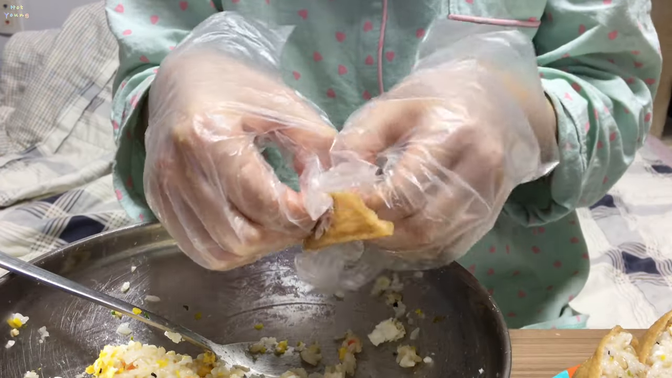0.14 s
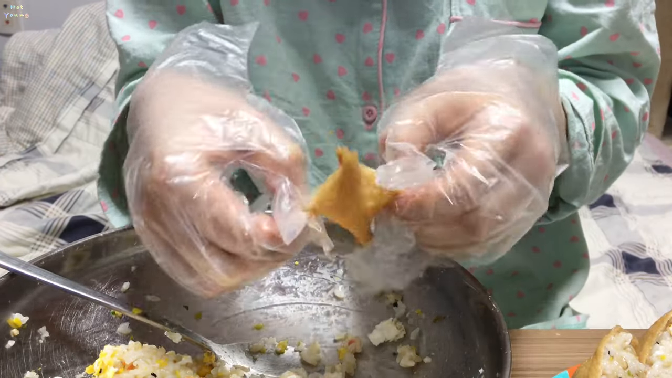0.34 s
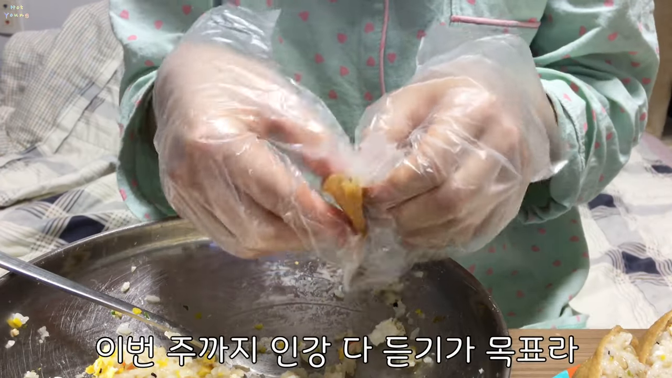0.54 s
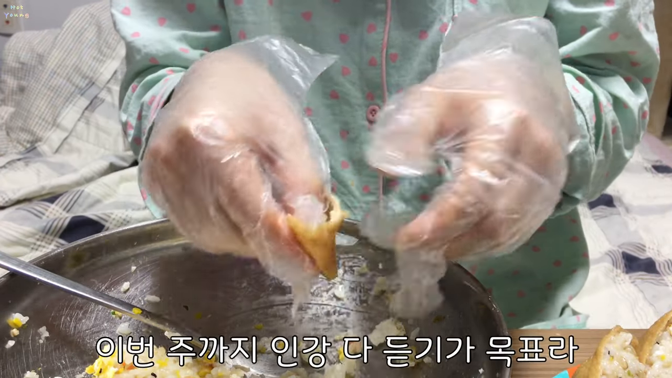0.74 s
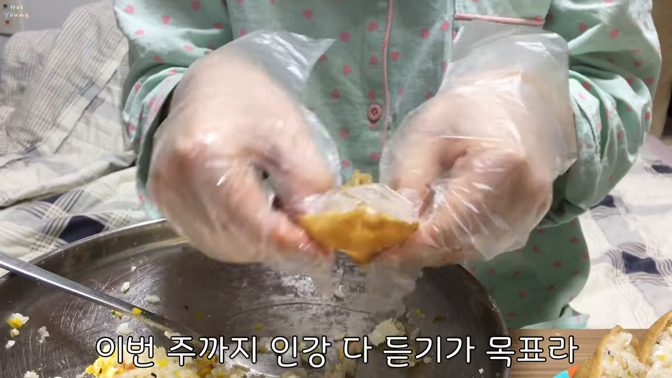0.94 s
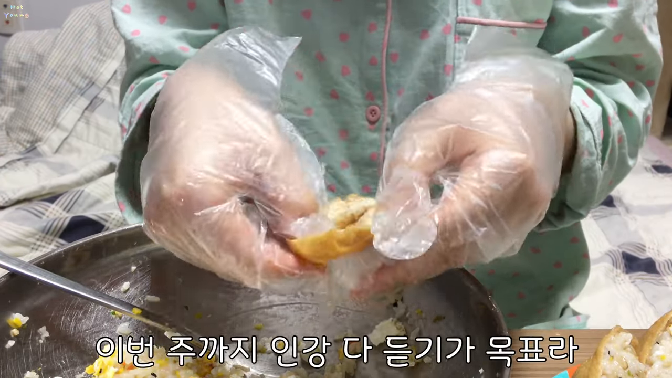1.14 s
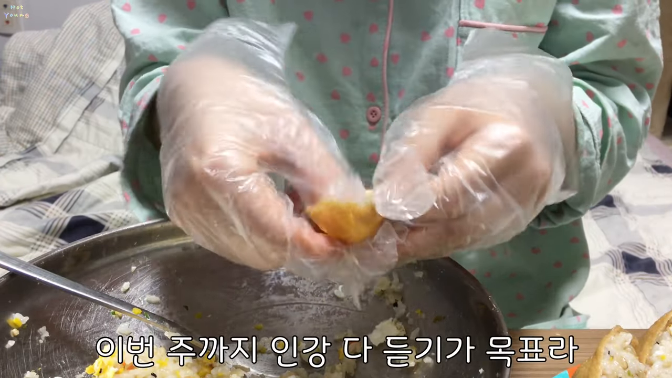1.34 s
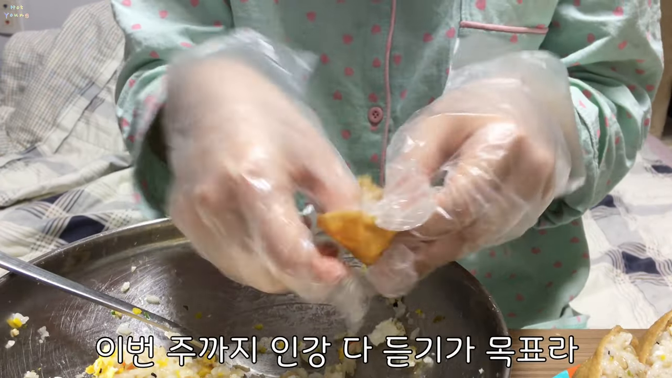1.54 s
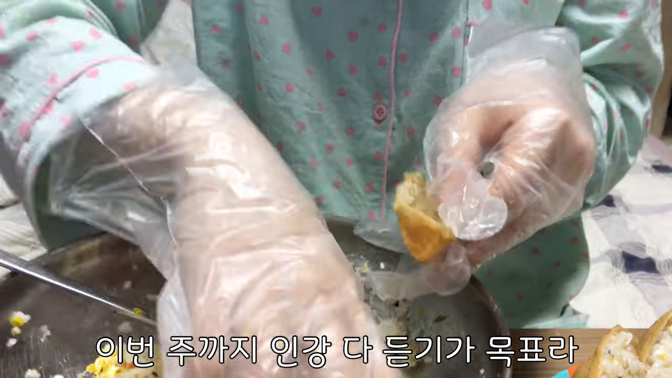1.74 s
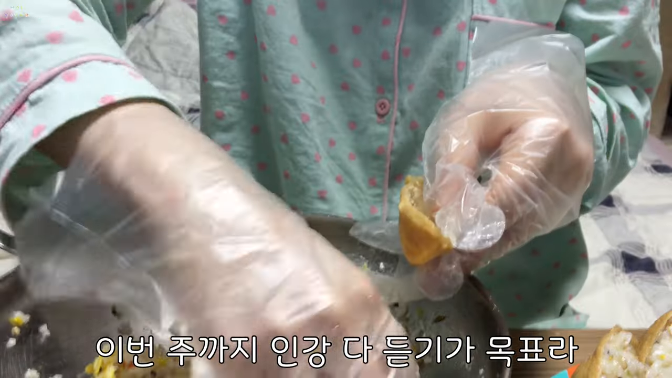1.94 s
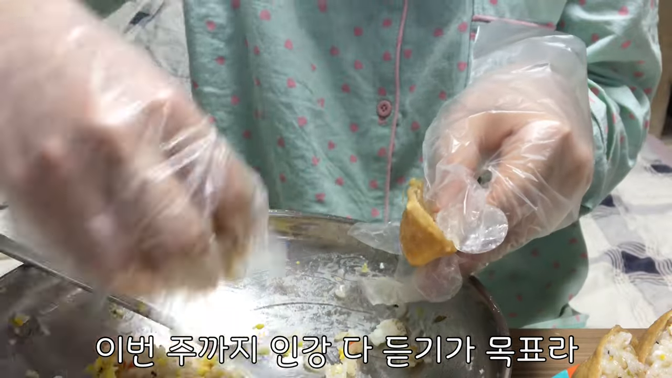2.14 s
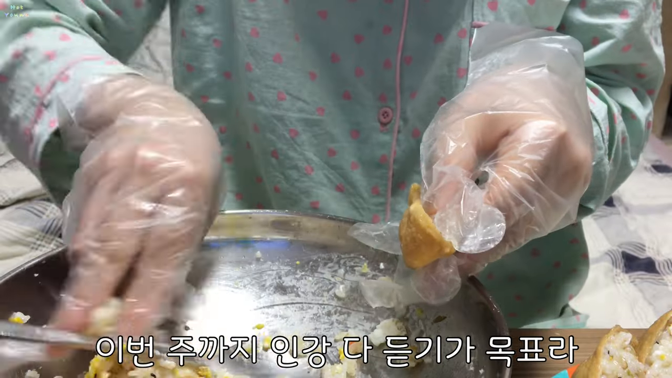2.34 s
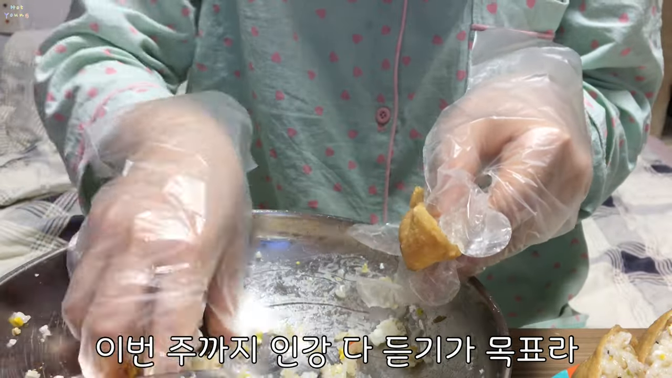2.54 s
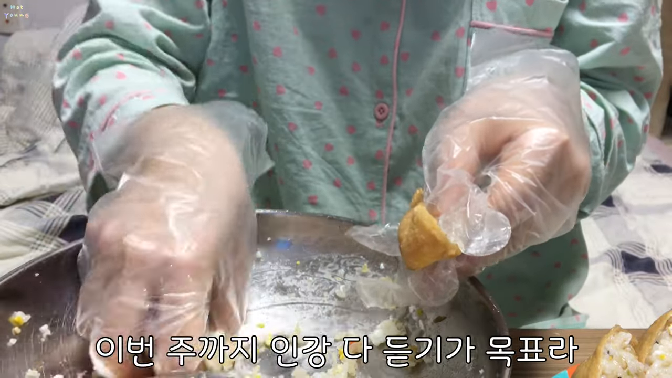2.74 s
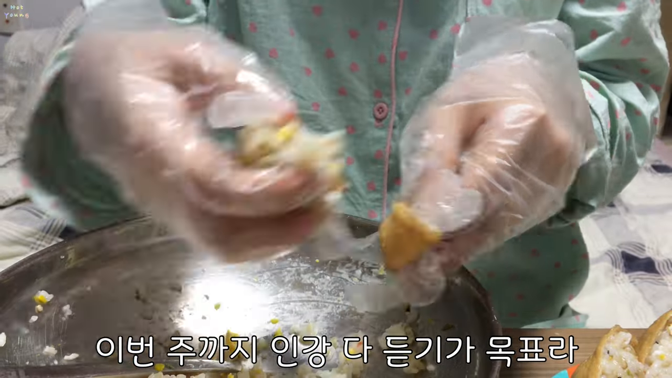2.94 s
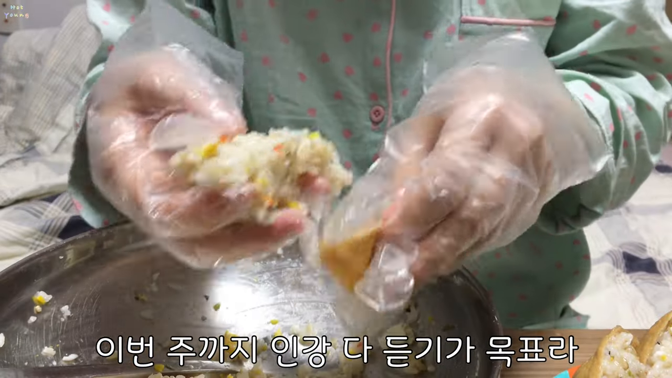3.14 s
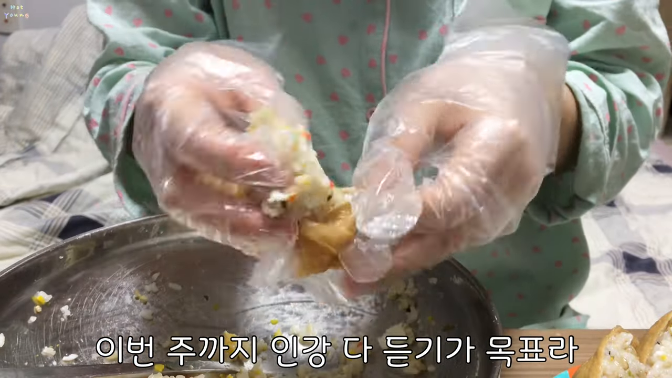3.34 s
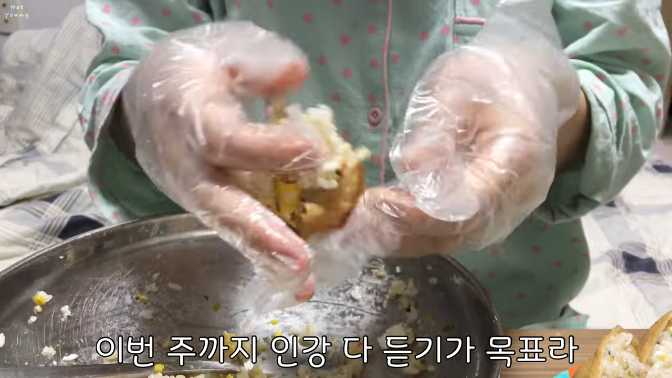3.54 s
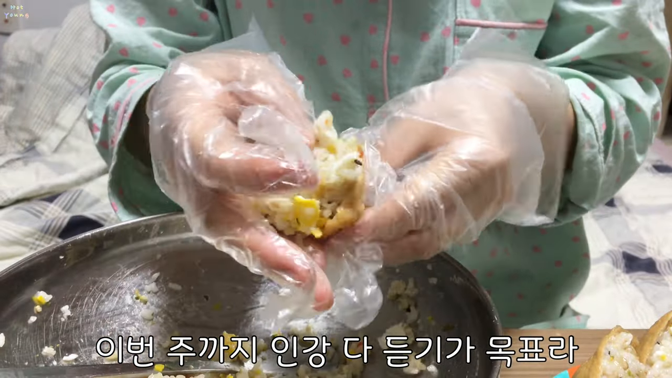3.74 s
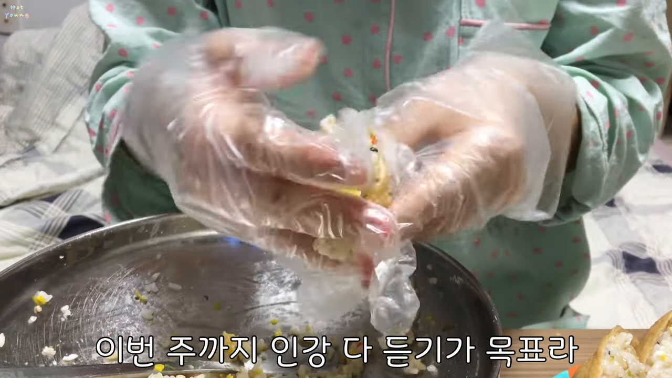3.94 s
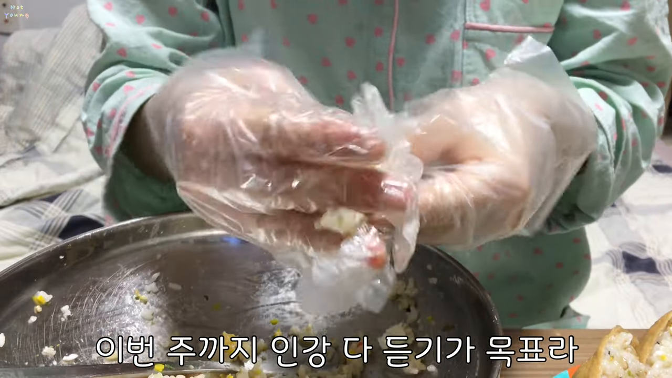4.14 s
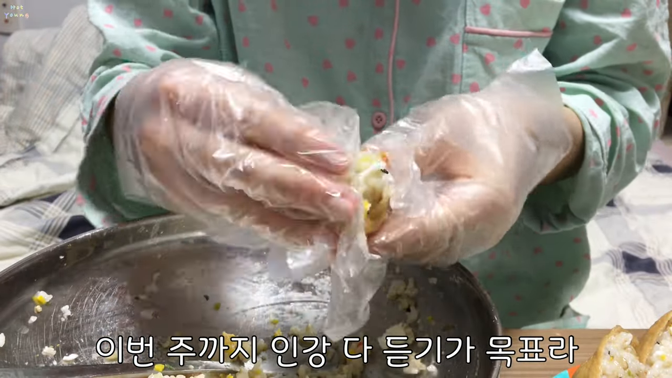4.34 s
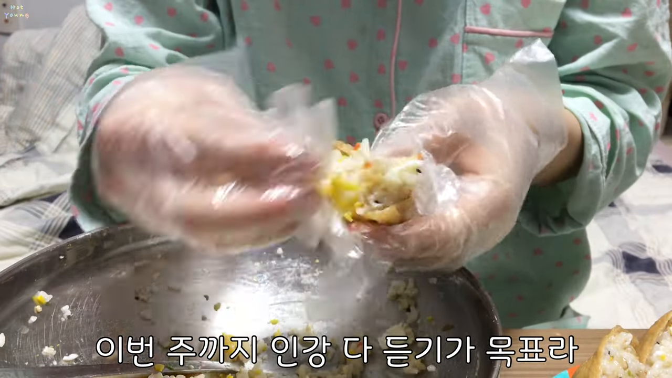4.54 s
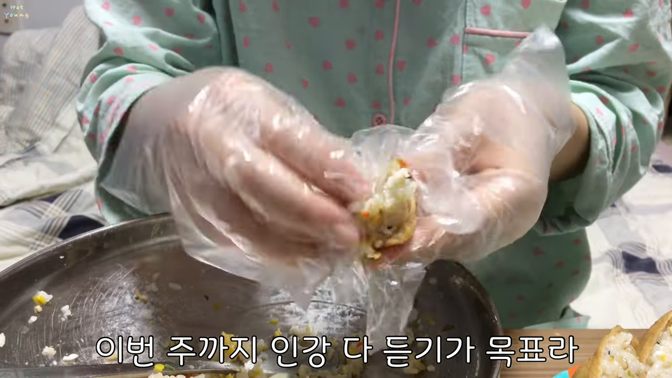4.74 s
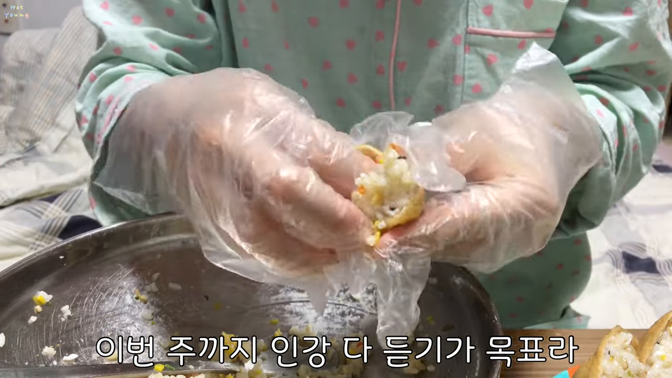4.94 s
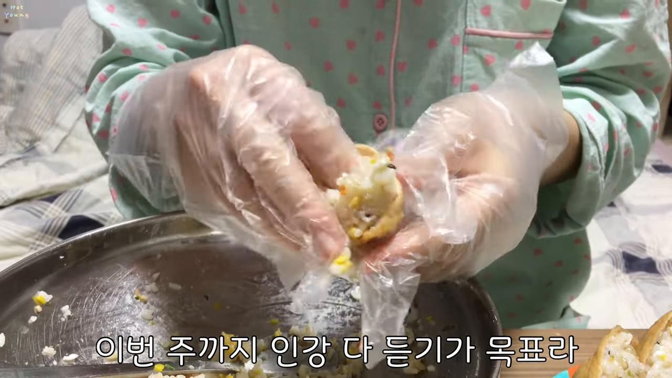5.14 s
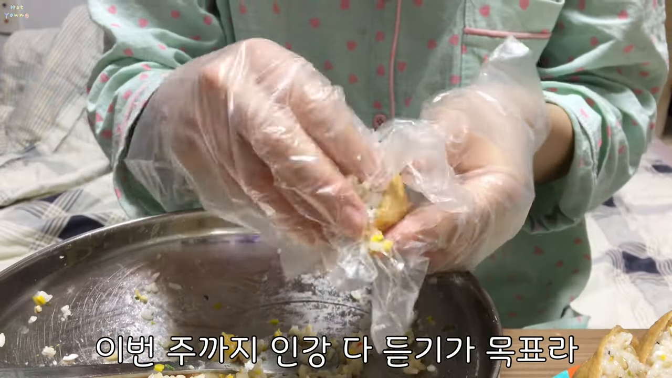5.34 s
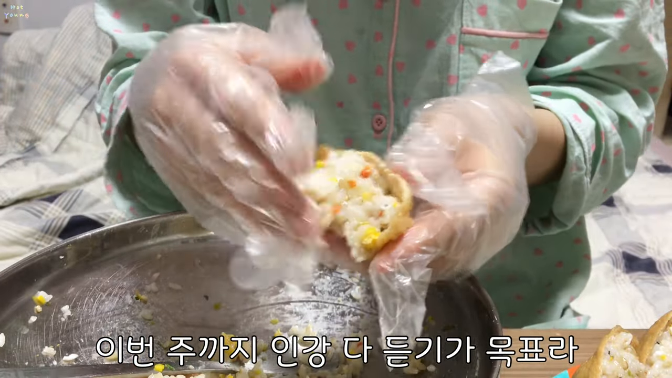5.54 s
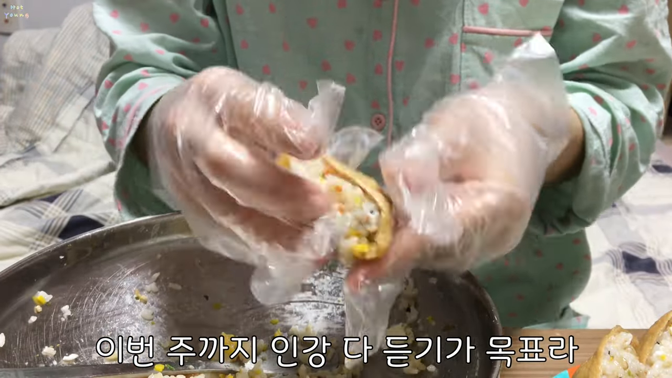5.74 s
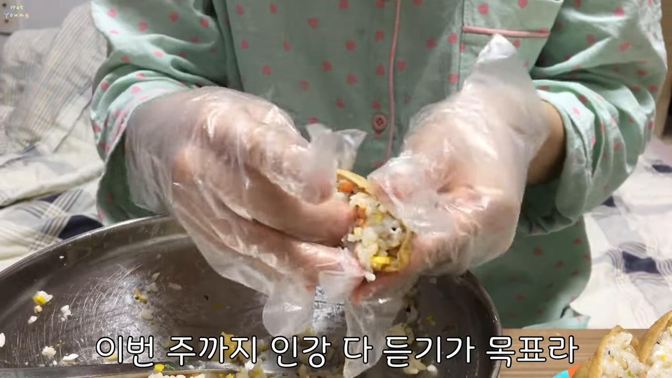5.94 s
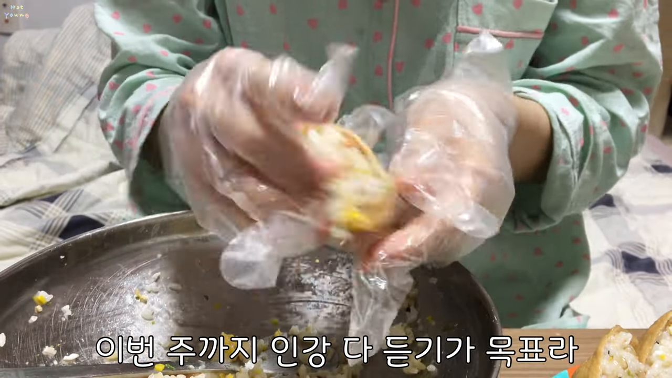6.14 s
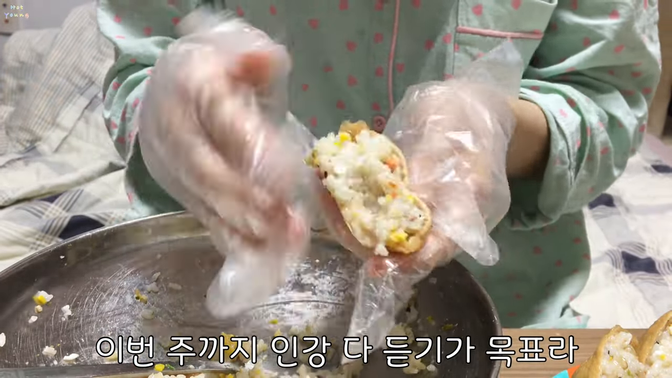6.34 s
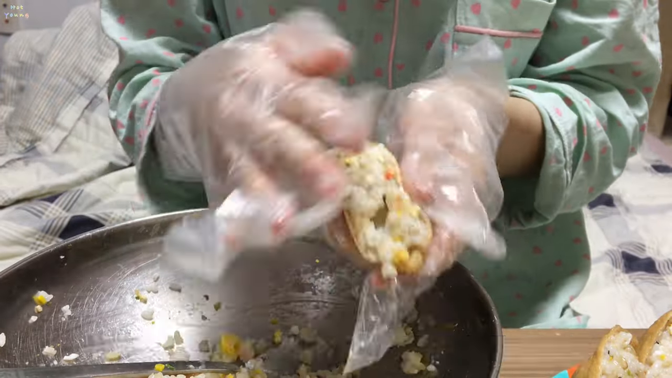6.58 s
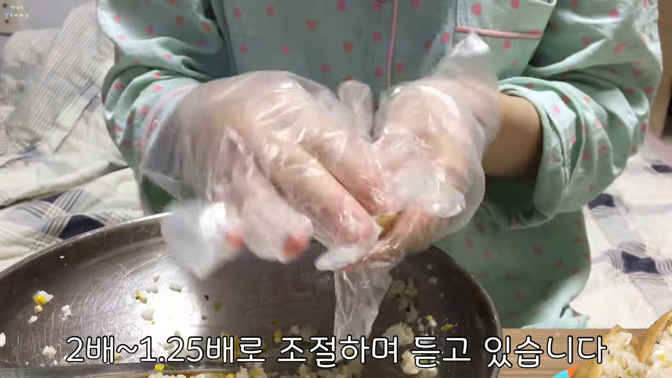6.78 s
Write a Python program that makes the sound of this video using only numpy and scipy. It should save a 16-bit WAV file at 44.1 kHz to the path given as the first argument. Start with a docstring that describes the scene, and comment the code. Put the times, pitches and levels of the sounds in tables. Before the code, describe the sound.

Hands in disposable gloves crackle steadily as they stuff rice, once knocking a metal tray and scraping along it.

```python
"""In a kitchen, close to a mono microphone, hands in thin plastic gloves stuff rice into a tofu pouch
over a steel tray. Each squeeze crinkles the plastic film in a swarm of tiny buckles, with a few louder
snaps, while film rubs on film. One hand reaches down, knocks the tray so it rings, rests a moment,
scrapes up rice along the steel and goes back to pressing. An appliance hums faintly behind it all."""
import sys
import numpy as np
from scipy import signal
from scipy.fft import rfft, irfft, next_fast_len
from scipy.io import wavfile
from scipy.ndimage import uniform_filter1d

SR = 44100
rng = np.random.default_rng(int(sys.argv[2]) if len(sys.argv) > 2 else 0)


def wrap_up_sound(samples):
    """Save the sound to the file named by the first command line argument, as 16-bit audio."""
    columns = np.atleast_2d(samples).T
    # keep every value between -1 and 1, then stretch to whole-number steps
    tamed = np.clip(columns, -1, 1)
    steps = np.round(tamed * 32767).astype(np.int16)
    wavfile.write(sys.argv[1], SR, steps)


N = 300321
TIME = np.arange(N) / SR

# finger squeezes: start t/s, length/s, crinkle level/dB, rubbing and slack folds (each relative
# to the crinkle)/dB, swell time/s
FINGER_SQUEEZES = [(0, 0.077, -56.5, -5.5, 10, 0.009), (0.076, 0.063, -47, -15.5, 2, 0.024),
                   (0.227, 0.01, -47.5, -9, 4.5, 0.011), (0.323, 0.081, -45.5, -10.5, 6, 0.051),
                   (0.45, 0.12, -47.5, -14, 4, 0.015), (0.57, 0.18, -49, -10.5, 6, 0.063),
                   (0.757, 0.27, -48, -10.5, 5, 0.096), (1.044, 0.078, -47, -11, 5, 0.028),
                   (1.134, 0.35, -51.5, -12, 7.5, 0.05), (1.532, 0.073, -45.5, -14, 3.5, 0.028),
                   (1.623, 0.18, -43.0, -10.5, 2, 0.06), (2.033, 0.04, -54.5, -2.5, 5, 0.032),
                   (2.258, 0.19, -45.5, -11.5, 3, 0.03), (2.505, 0.11, -46.5, -13, -6, 0.045),
                   (2.92, 0.18, -51.5, -9.5, -5, 0.023), (3.226, 0.33, -54, -24, 1, 0.037),
                   (3.47, 0.27, -46, -13, -5, 0.062), (3.872, 0.09, -46, -9.5, -1.5, 0.053),
                   (4.015, 0.12, -50, -7, 1, 0.012), (4.15, 0.071, -46, -9.5, -1, 0.033),
                   (4.322, 0.11, -46.5, -10, 7.5, 0.044), (4.44, 0.067, -45, -15, -4, 0.056),
                   (4.601, 0.052, -45.5, -7, 6, 0.041), (4.694, 0.112, -46, -11.5, -2, 0.033),
                   (5.031, 0.081, -43, -11, 2, 0.037), (5.167, 0.023, -41.5, -13, 4.5, 0.021),
                   (5.202, 0.069, -47.5, -18, 1, 0.026), (5.429, 0.12, -45.5, -16.5, 0, 0.057),
                   (5.565, 0.18, -46.5, -11.5, -1, 0.03), (5.674, 0.061, -43, -8.5, 1, 0.036),
                   (5.765, 0.05, -48.5, -4.5, 9, 0.026), (5.905, 0.11, -50.5, -11, 5.5, 0.069),
                   (6.043, 0.031, -43.5, -10, 2, 0.05), (6.128, 0.13, -47, -11, -1.5, 0.017),
                   (6.288, 0.2, -41, -13, -1, 0.075), (6.541, 0.11, -48.5, -9, 0, 0.024),
                   (6.722, 0.061, -45, -15, 2, 0.029)]
# steady handling between squeezes, with a rest after the knock: t/s, crinkle level/dB
STEADY_HANDLING = [(0, -49.5), (0.2, -51.5), (0.33, -58.5), (0.41, -51), (1.11, -52.5), (1.51, -56),
                   (1.85, -44.5), (2, -47.0), (2.14, -62.5), (2.27, -47), (2.7, -48.5), (2.88, -50),
                   (3.18, -51.5), (3.47, -47.5), (4.3, -45), (4.58, -48.5), (4.9, -47.0), (5.41, -46.5),
                   (5.89, -48.0), (6.81, -48.5)]
# tone colour of buckling film: f/Hz, relative level/dB
FILM_COLOUR = [(200, -14), (1200, -11), (2300, -11), (3100, -2), (4000, -5.5), (5000, -1.5), (5900, -1.1),
               (7000, -2), (9000, 0.5), (11200, 1.5), (12400, -1), (13600, 2), (15700, 4.5)]
# tone colour of film rubbing on film: f/Hz, relative level/dB
RUB_COLOUR = [(40, -27), (90, -29), (150, -2), (300, -4.5), (450, -2.5), (700, 1), (1000, 2.5), (1300, 1),
              (2200, 2), (4000, 0), (12000, -9.5)]
# the loudest creases snapping through: t/s, level/dB, f/Hz, relative level of the flurry after it/dB
CREASE_SNAPS = [(0.1052, -27, 5000, -13), (0.148, -27, 9500, -30), (0.3108, -30.5, 6360, -18),
                (0.3514, -34, 4200, -14), (0.459, -27, 8440, -9), (0.528, -28, 7810, -5),
                (0.5635, -29, 10200, -7), (0.6344, -24, 7240, -9), (0.706, -22, 11200, -20),
                (1.6077, -25, 12000, -6), (1.87, -29, 11100, -13), (3.0983, -27, 7980, -18),
                (3.147, -23, 13900, -21), (3.7792, -29, 7240, -4.5), (3.8989, -35, 11100, -22),
                (3.941, -24, 12000, -5), (4.3246, -23, 9030, -15), (4.5213, -34, 12000, -16),
                (4.632, -31, 3400, -2), (4.648, -30, 3500, -5), (5.0938, -28, 10000, -18),
                (5.1895, -28, 13100, -5), (5.3276, -24, 10500, -5), (5.9212, -29, 10100, -25),
                (6.0017, -27, 7050, -18), (6.08, -28, 9000, -20), (6.147, -27, 5280, -5)]
# blows on the tray: t/s, strength/dB, hardness (treble gain)/dB, clatter gain/dB, table thud level/dB,
# gain of the belly tone (the tray's middle)/dB
TRAY_KNOCKS = [(1.76, -13.5, -5, 5, -36, -7), (1.7685, -15, 3.5, 6.5, -43, -6),
               (1.874, -34, -15, 2, -60, -8), (1.9387, -19, -15, 8, -54, 2),
               (1.9495, -7.5, 9, 4, -44, -4.5), (2.2716, -34, 14, -10, -60, -6),
               (2.2852, -24.5, 13, -8, -73, 10), (2.3428, -19.5, -15, -6, -63, 1),
               (5.238, -34.5, -15, -3, -76, 3.5), (6.43, -29.5, -10, 0, -68, 1)]
# the steel rebounds after a blow: delay t/s, relative level/dB
REBOUNDS = [(0, 0), (.0023, -7), (.0062, -7), (0.012, -17)]
# ringing tones of the tray, damped by food and table: f/Hz, level/dB, time to fade by 60 dB/s
TRAY_TONES = [(325, -31, .07), (385, -32, .05), (465, -32, .045), (554, -23.5, .09), (635, -33, .04),
              (720, -29, .09), (827, -40, .11), (1584, -36, .05), (2870, -38, .05), (3050, -37, .04),
              (3222, -37, .07), (4950, -35, .085), (5895, -37, .09), (6203, -33, .09), (6700, -32, .04),
              (7770, -36, .085), (8358, -22, .058), (8560, -29, .04), (9510, -21, .04), (9596, -29, .08),
              (10024, -23, .058), (10690, -36, .15), (12880, -36, .07), (14255, -34, .05),
              (14768, -31, .05), (15394, -29, .055)]
# tones of the table under the tray: f/Hz, level/dB, time to fade by 60 dB/s
TABLE_TONES = [(123, -0.5, 0.092), (186, -12, 0.04)]
# tone colour of the tray's short, dense clatter: f/Hz, relative level/dB
CLATTER_COLOUR = [(100, -8), (400, 16.5), (750, 8.5), (1100, -6), (2200, -5), (3000, -7), (7000, 2),
                  (9500, 15), (11500, 0), (13500, 5), (16000, 6.5)]
# strokes dragging rice over the steel: start t/s, length/s, level/dB
SCRAPE_STROKES = [(2.279, 0.025, -38.5), (2.327, 0.28, -47.5), (2.384, 0.037, -41), (2.52, 0.1, -45.5),
                  (2.59, 0.023, -43), (2.66, 0.15, -45.5)]
# sticky slips during the scrape: t/s, level/dB, f/Hz
SCRAPE_SLIPS = [(2.311, -21, 4660), (2.407, -24, 4400), (2.6154, -22, 3230), (2.6206, -16.5, 3660),
                (2.646, -23, 4350), (2.7113, -29, 4050), (2.732, -21.5, 3920), (2.768, -24, 4480),
                (2.7976, -26, 4720), (2.831, -22, 5200)]
# tones of the steel under the scraping hand: f/Hz, width/Hz, relative level/dB
SCRAPE_TONES = [(3310, 200, -7.5), (3740, 150, -23), (4470, 150, -22)]
# forearms and sleeves shifting against the table: t/s, level/dB
ARM_NUDGES = [(2.02, -67), (2.55, -68), (2.76, -67), (4.35, -71), (4.69, -67), (5.86, -81)]
# the kitchen's echo: f/Hz, time to fade by 60 dB/s
ROOM_FADE = [(150, 0.73), (1000, 0.17), (5000, 0.29), (15000, 0.074)]
# tone colour of still kitchen air: f/Hz, relative level/dB
AIR_COLOUR = [(25, -34), (45, 21), (80, -14), (140, 12.5), (260, 1), (500, 8), (1000, 2.5), (3000, -9),
              (15000, -19)]
# appliance hum: f/Hz, level/dB
HUM_TONES = [(85, -88), (120, -98), (256, -79), (332, -81.5), (428, -90.5)]


def crinkle(level_db, slack_db, sizes=60):
    """Film buckles in patches of many sizes over a fine sliding hiss; a faster hand sets off more."""
    clicks_per_s = 2700 * amp(1.1 * (level_db + 46))
    clicks = swarm(clicks_per_s, spread_db=2, clump_db=1.1, clumps_per_s=120)
    click_size = rng.integers(0, sizes, N)
    buckles = np.zeros(N)
    for k, hz in enumerate(np.linspace(2000, 15500, sizes)):
        ring = unit_rms(flip(hz, cycles=0.23 + 2.5 * rng.random() ** 3))
        starts = np.flatnonzero((clicks != 0) & (click_size == k))
        samples = starts[:, None] + np.arange(len(ring))
        rings = np.outer(clicks[starts], ring)
        buckles += np.bincount(samples.ravel(), rings.ravel(), N)[:N]  # add one ring per click
    hiss = amp(-6) * rng.standard_normal(N)
    film = steadied(coloured(unit_rms(buckles) + hiss, FILM_COLOUR))
    slack_folds = filtered(film, [2700, 6500], "band", order=1)  # loose film crackles lower
    return amp(level_db) * crease_tint(film + (amp(slack_db) - 1) * slack_folds)


def crease_tint(film, depth_db=1.4):
    """Each passing crease favours a tone colour of its own."""
    spectrum = signal.stft(film, SR, nperseg=256)[2]
    patches = uniform_filter1d(rng.standard_normal(spectrum.shape), size=8, axis=0)  # smooth over pitch
    patches = unit_rms(uniform_filter1d(patches, size=5, axis=1))  # and over time
    return signal.istft(spectrum * amp(depth_db * patches), SR, nperseg=256)[1][:N]


def hand_levels(steady_rub_db=-13.5, steady_slack_db=2):
    """Squeezes add to the steady handling; gives crinkle, rubbing and relative slack levels in dB."""
    steady = amp(np.interp(TIME, *np.transpose(STEADY_HANDLING)))
    power = np.outer(amp([0, steady_rub_db, steady_slack_db]), steady) ** 2
    for start, length, db, rub_db, slack_db, swell_s in FINGER_SQUEEZES:
        effort = amp(db) * stroke(start, length, swell_s, fade_s=0.22)
        power += np.outer(amp([0, rub_db, slack_db]), effort) ** 2
    uneven_db = 0.9 * wander(per_s=35)  # fingers never press quite evenly
    crinkle_db, rub_db, folds_db = 10 * np.log10(power) + uneven_db
    return crinkle_db, rub_db, folds_db - crinkle_db


def snaps():
    """A crease gives way with a crack and a brief ring, and shakes loose a flurry of small ticks."""
    out, t = np.zeros(N), np.arange(2000) / SR
    for start, db, hz, flurry_db in CREASE_SNAPS:
        flurry = amp(flurry_db - 60 * t / 0.025) * rng.standard_normal(len(t))
        flurry *= rng.random(len(t)) < 1500 / SR  # about 1500 ticks a second
        flurry[0] = 1  # the snap itself
        tick = 0.58 * flip(hz, cycles=0.59) + 0.55 * flip(10500, cycles=0.36)
        add(out, start, amp(db) * np.convolve(flurry, tick))
    return filtered(out, 2800, "high")


def rubbing(level_db, boost_db=2.5):
    """Film slides on film and food, making softer, duller grains of sound."""
    grains = swarm(3500, spread_db=4, clump_db=1, clumps_per_s=63)
    return amp(level_db + boost_db) * steadied(coloured(grains, RUB_COLOUR))


def tray_knocks():
    """Each blow makes the tray ring and clatter and the table thud; soft blows lack treble."""
    out, t = np.zeros(N), np.arange(SR // 3) / SR
    thud = sum(np.sin(2 * np.pi * hz * t) * amp(db - 60 * t / fade_s) for hz, db, fade_s in TABLE_TONES)
    thud *= 1 - np.exp(-t / 0.002)
    clatter_shape = amp(-9.5 - 60 * t / 0.11)
    bounces = np.zeros(len(t))
    for delay, db in REBOUNDS:
        clatter_shape += (t >= delay) * amp(db - 60 * abs(t - delay) / 0.011)
        add(bounces, delay, amp([db]))
    # the steel flexes under each contact, and clacks if the blow is hard
    flex = amp(-16.5) * signal.lfilter(flip(595, cycles=0.6), 1, bounces)
    clack = amp(-16) * signal.lfilter(flip(2720, cycles=0.48), 1, bounces)
    for start, db, hard_db, clatter_db, thud_db, belly_db in TRAY_KNOCKS:
        ring = tray_ring(belly_db)
        noise = coloured(rng.standard_normal(len(t)), CLATTER_COLOUR)
        clatter = amp(clatter_db - 19) * clatter_shape * noise
        bass = filtered(amp(1) * ring + clatter, 1640, "low")
        treble = filtered(ring + amp(db / 2) * clatter, 1700, "high")  # weak blows clatter more dully
        contact = amp(min(clatter_db, 0)) * flex + amp(min(hard_db, clatter_db, 0)) * clack
        add(out, start, amp(db) * (bass - amp(hard_db) * treble + contact) + amp(thud_db) * thud)
    return out


def tray_ring(belly_db, belly_hz=554):
    """The tray's tones die away after a blow; taps near its middle ring mostly the belly tone."""
    ring, t = np.zeros(SR // 3), np.arange(SR // 3) / SR
    for k, (hz, db, fade_s) in enumerate(TRAY_TONES):
        level_db = db + belly_db * (hz == belly_hz) - 60 * t / fade_s
        ring += (-1) ** k * amp(level_db) * np.sin(2 * np.pi * hz * t)
    return ring


def scrape(closing_at_s=2.64, smother_db_per_s=150):
    """The glove sticks and slips, ringing the steel and a pocket of film until the fingers close."""
    power = sum((amp(db) * stroke(start, length, swell_s=0.022, fade_s=0.24)) ** 2
                for start, length, db in SCRAPE_STROKES)
    closing_s = np.clip(TIME - closing_at_s, 0, 0.2)
    slips = swarm(2200, spread_db=3.5, clump_db=1.5, clumps_per_s=140)
    pocket = film_pocket(slips, hz=3280 + 6000 * closing_s)  # closing fingers raise its pitch
    low_ring = filtered(tray_ring(belly_db=5), 750, "low")
    murmur = unit_rms(signal.oaconvolve(slips, low_ring)[:N])
    steel = sum(amp(db) * unit_rms(signal.lfilter(*signal.iirpeak(hz, hz / width, fs=SR), slips))
                for hz, width, db in SCRAPE_TONES)
    steel = amp(-smother_db_per_s * closing_s) * filtered(steel, 2450, "high")
    out = np.sqrt(power) * (amp(-3) * pocket + steel + amp(-26) * murmur)
    for start, db, hz in SCRAPE_SLIPS:
        add(out, start + 0.001037, amp(db - 5.5) * flip(hz, cycles=1))
    return out


def film_pocket(slips, hz, width_hz=6000):
    """A pocket of film under the hand rings broadly around a moving pitch."""
    spin = np.exp(2j * np.pi * np.cumsum(hz) / SR)
    decay = np.exp(-np.pi * width_hz / SR)
    # shift the pitch down to zero, smooth, and shift it back up
    ring = (spin * signal.lfilter([1], np.poly([decay, decay]), slips / spin)).real
    ring = filtered(ring, 2690, "high", order=7)
    return steadied(filtered(ring, 6400, "low"))


def arm_nudges():
    """Shifting forearms send soft, low swells through the table top."""
    out, swell = np.zeros(N), np.hanning(round(0.14 * SR))
    for middle, db in ARM_NUDGES:
        add(out, middle - len(swell) / SR / 2, amp(db) * swell)
    return out * unit_rms(filtered(rng.standard_normal(N), [65, 160], "band"))


def kitchen_echo(x, echo_db, patterns=3):
    """Adds a short echo that dies faster in the treble; its pattern shifts as the hands move."""
    t, out = np.arange(SR // 2) / SR, x.copy()
    for k in range(patterns):
        hz, age, spectrum = signal.stft(rng.standard_normal(len(t)), SR, nperseg=256)
        fade = amp(-60 * age / look_up(ROOM_FADE, hz)[:, None])
        tail = signal.istft(spectrum * fade, SR, nperseg=256)[1][:len(t)]
        tail *= (t > 0.002) * (1 + 1.8 * np.exp(-t / 0.0035))  # close surfaces answer first
        share = np.cos(np.pi * (2 * TIME + k / patterns)) * np.sqrt(2 / patterns)
        out += amp(echo_db) * signal.oaconvolve(x * share, tail / np.linalg.norm(tail))[:N]
    return out


def air_and_hum(air_db=-71):
    """Faint room noise with a wavering appliance hum."""
    hum = np.zeros(N)
    for hz, db in HUM_TONES:
        height = np.sqrt(2) * amp(db + 2 * wander(6))
        hum += height * np.sin(2 * np.pi * hz * TIME + 0.55 * wander(10))
    return amp(air_db) * coloured(rng.standard_normal(N), AIR_COLOUR) + hum


def flip(hz, cycles):
    """A patch of film or steel flips and swings briefly, strongest after `cycles` swings."""
    turns = hz * np.arange(256) / SR
    age = turns / cycles
    return age * np.exp(1 - age) * np.sin(2 * np.pi * turns)


def swarm(per_s, spread_db, clump_db, clumps_per_s):
    """Random clicks, mostly small, growing louder and softer in little clumps."""
    size_db = spread_db * np.minimum(rng.exponential(1, N), 4.5) + clump_db * wander(clumps_per_s)
    return (rng.random(N) < per_s / SR) * rng.choice([-1, 1], N) * amp(size_db)


def stroke(start, length, swell_s, fade_s):
    """Loudness of one hand movement: it swells, holds, then drops 60 dB in fade_s."""
    age = TIME - start
    return np.clip(age / swell_s, 0, 1) * amp(-60 * np.clip(age - length, 0, 2 * fade_s) / fade_s)


def wander(per_s):
    """Random drift of average size 1, heading for a new value per_s times a second."""
    return unit_rms(np.interp(TIME * per_s, np.arange(8000), rng.standard_normal(8000)))


def steadied(x):
    """Takes the slow swell out of a swarm, so that the hand alone sets its loudness."""
    power = uniform_filter1d(x ** 2, 2600)
    return x / np.sqrt(abs(power) + power.mean() / 1000)


def coloured(x, colour):
    """Gives x the tone colour in a table, at average size 1."""
    size = next_fast_len(len(x) + 1024)
    gain = amp(look_up(colour, np.fft.rfftfreq(size, 1 / SR)))
    return unit_rms(irfft(rfft(x, size) * gain, size)[:len(x)])


def look_up(table, hz):
    """Reads between a table's rows, with every octave equally wide."""
    row_hz, value = np.transpose(table)
    return np.interp(np.log(hz + 1), np.log(row_hz + 1), value)


def filtered(x, hz, kind, order=2):
    """Keeps the lows, the highs or a band of x."""
    return signal.sosfilt(signal.butter(order, hz, kind, fs=SR, output="sos"), x)


def amp(db):
    """Turns decibels into a gain."""
    return 10 ** (np.asarray(db) / 20)


def unit_rms(x):
    """Scales x to an average size (rms) of 1."""
    return x / np.sqrt(np.mean(x ** 2) + 1e-20)


def add(mix, start_s, sound):
    """Adds a sound to the mix at start_s."""
    part = mix[max(round(start_s * SR), 0):][:len(sound)]
    part += sound[:len(part)]


def scene():
    """Gloves and tray in the kitchen, the same in both channels."""
    crinkle_db, rub_db, slack_db = hand_levels()
    gloves = crinkle(crinkle_db, slack_db) + rubbing(rub_db) + snaps() + scrape()
    mono = kitchen_echo(gloves, echo_db=-14) + kitchen_echo(tray_knocks(), echo_db=-25)
    mono += arm_nudges() + air_and_hum()
    return np.array([mono, mono])


def record(dry, lowest_hz=80, highest_hz=15800):
    """The microphone loses the deep bass, and the recorder cuts off the highest treble."""
    thinned = filtered(dry, lowest_hz, "high", order=4)
    treble_cut = signal.firwin(511, highest_hz, window=("kaiser", 8), fs=SR)
    return signal.oaconvolve(thinned, treble_cut[None], "same", axes=1)


dry = scene()
out = record(dry)
wrap_up_sound(out)
```